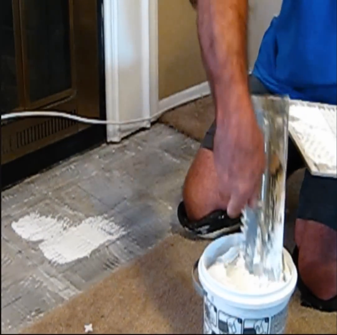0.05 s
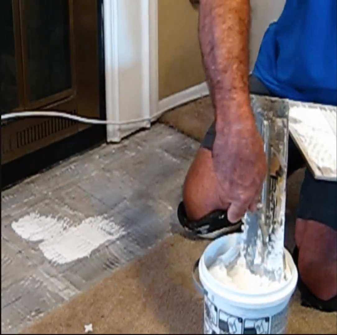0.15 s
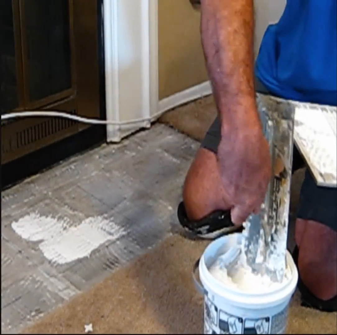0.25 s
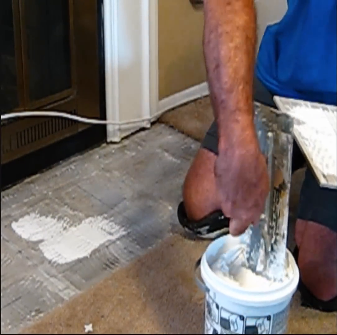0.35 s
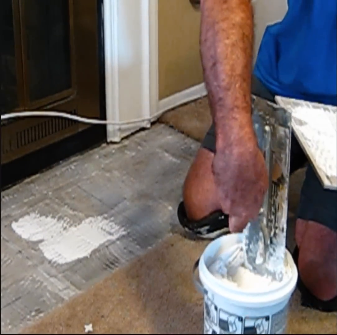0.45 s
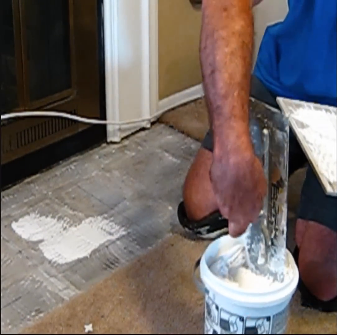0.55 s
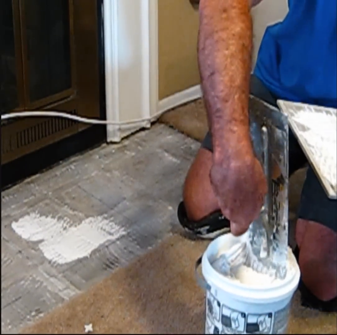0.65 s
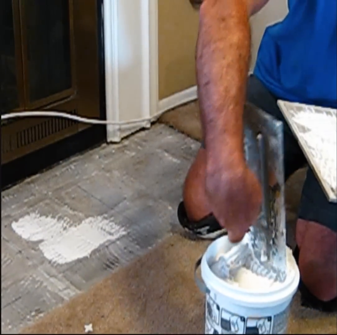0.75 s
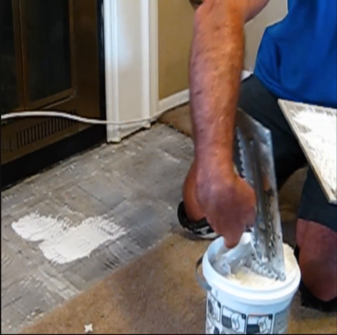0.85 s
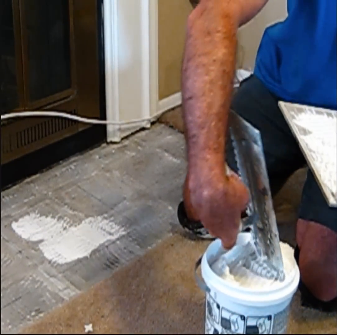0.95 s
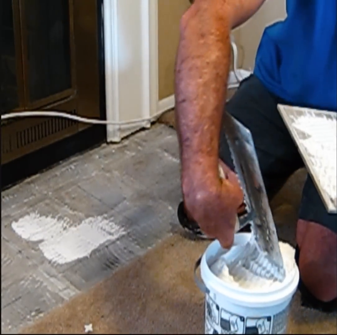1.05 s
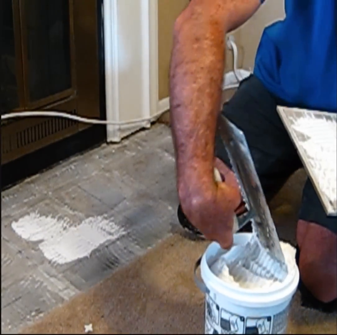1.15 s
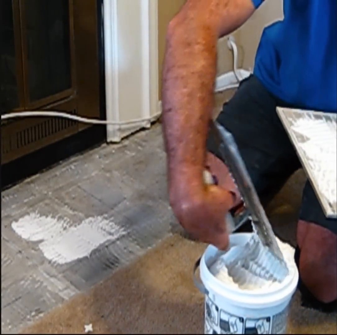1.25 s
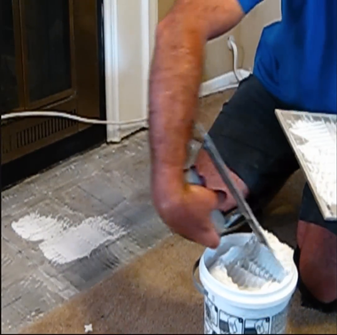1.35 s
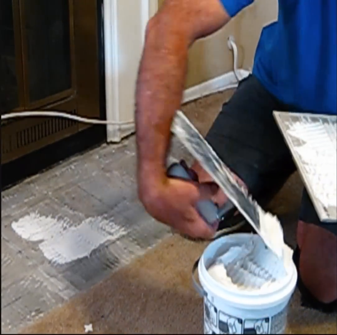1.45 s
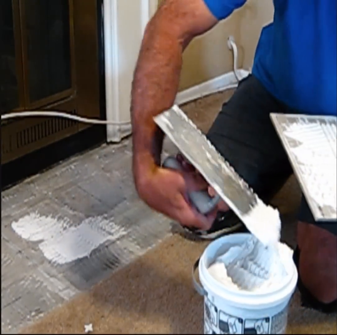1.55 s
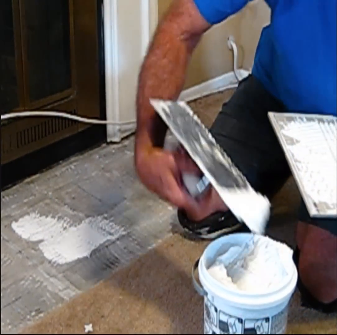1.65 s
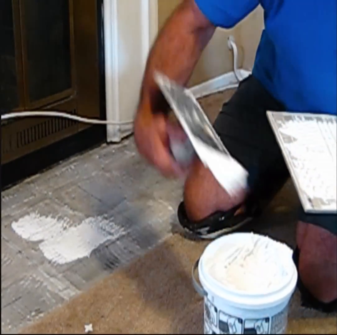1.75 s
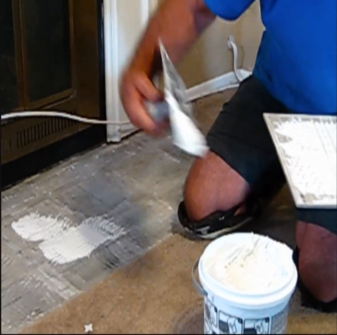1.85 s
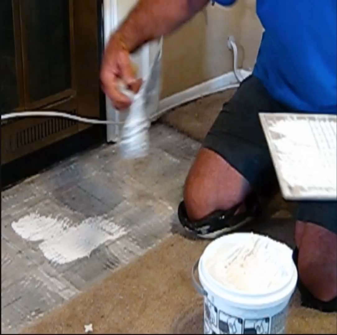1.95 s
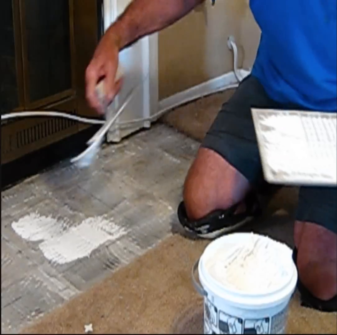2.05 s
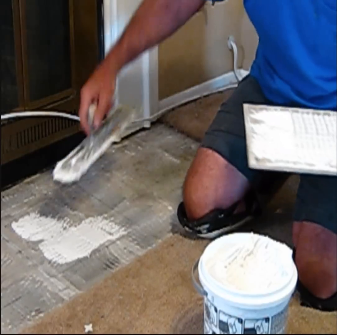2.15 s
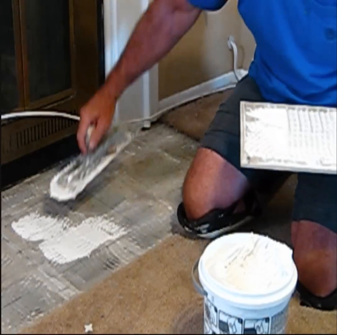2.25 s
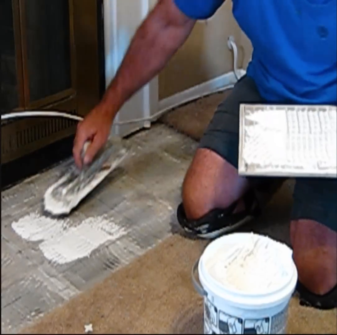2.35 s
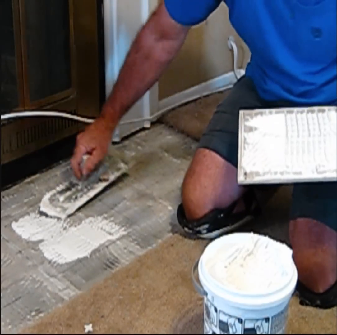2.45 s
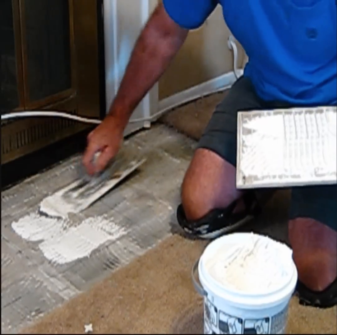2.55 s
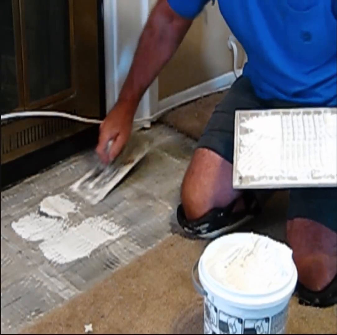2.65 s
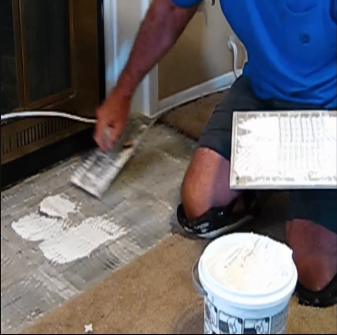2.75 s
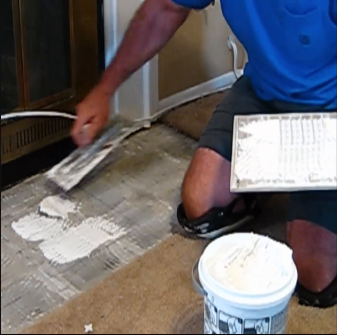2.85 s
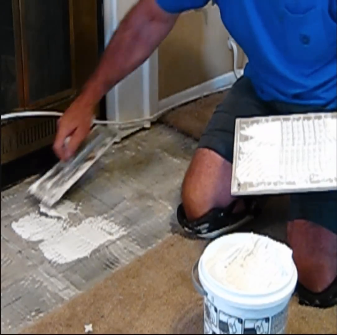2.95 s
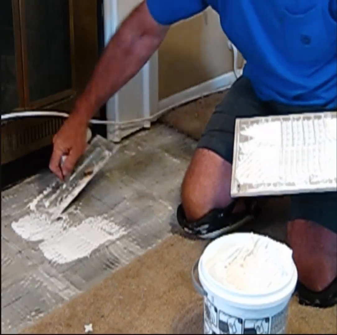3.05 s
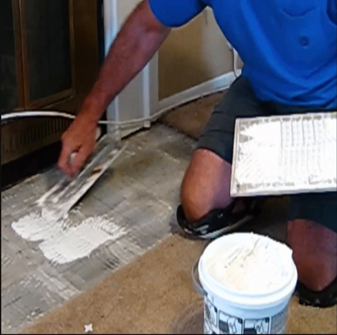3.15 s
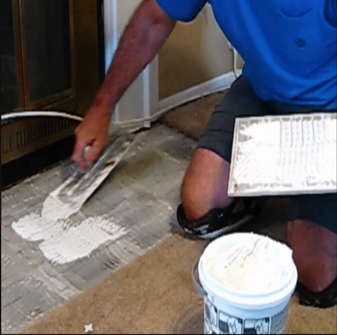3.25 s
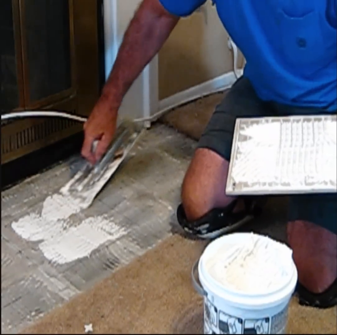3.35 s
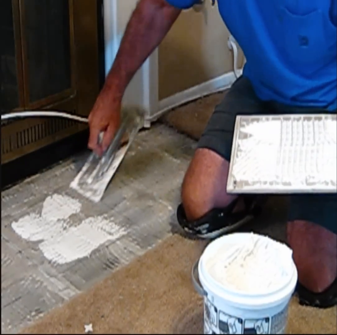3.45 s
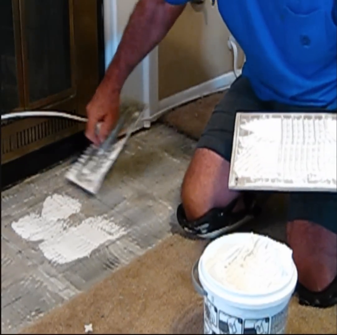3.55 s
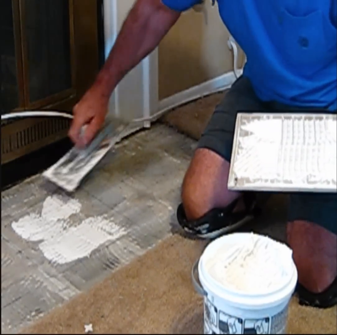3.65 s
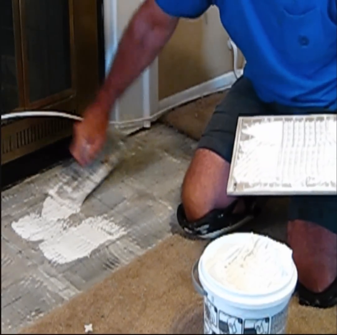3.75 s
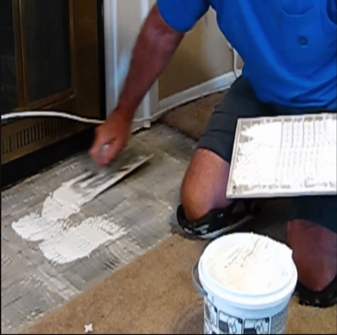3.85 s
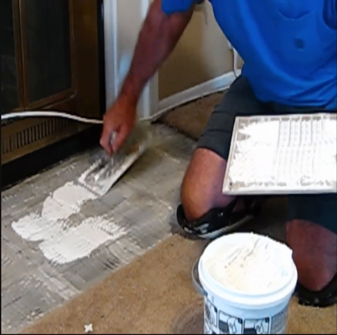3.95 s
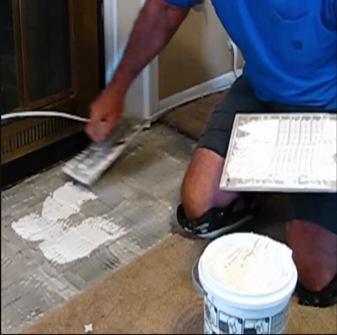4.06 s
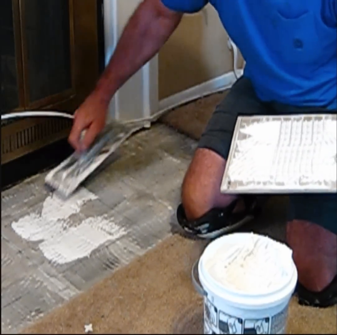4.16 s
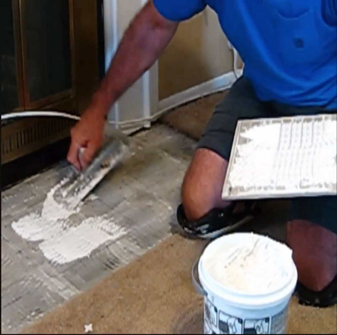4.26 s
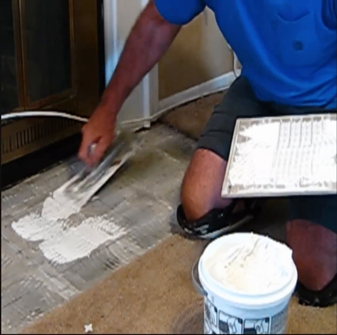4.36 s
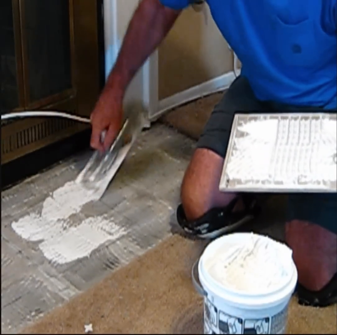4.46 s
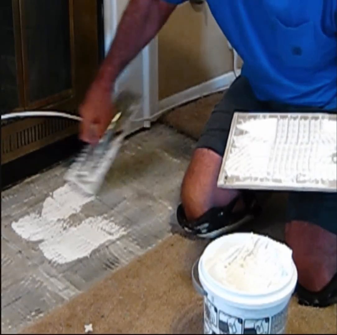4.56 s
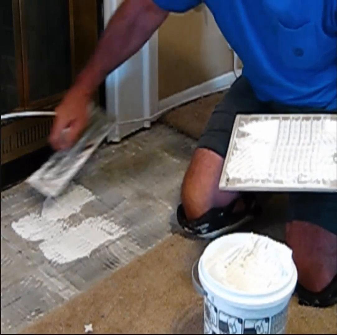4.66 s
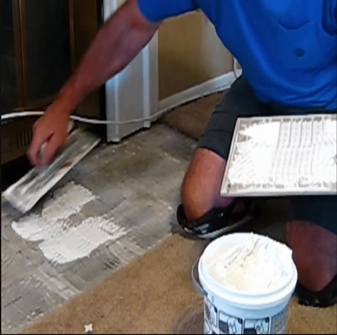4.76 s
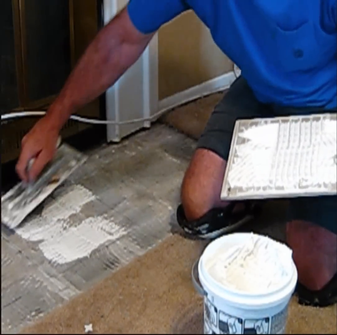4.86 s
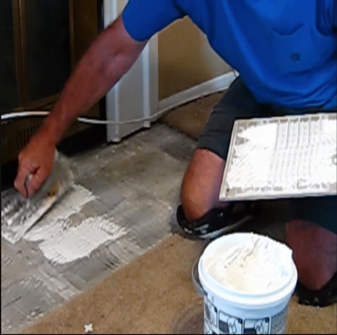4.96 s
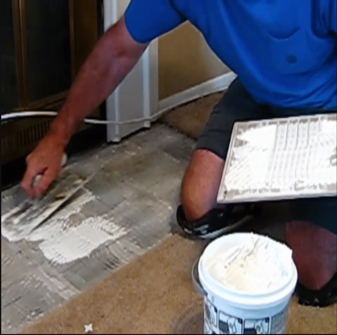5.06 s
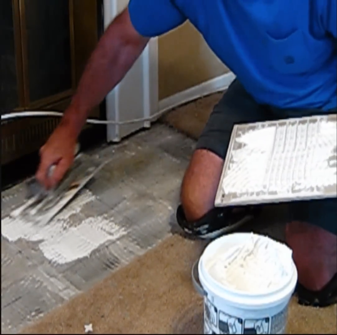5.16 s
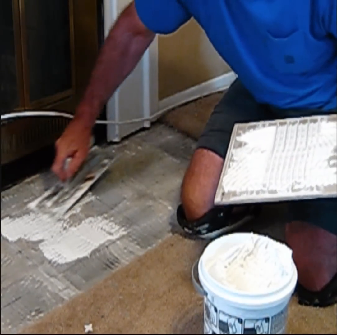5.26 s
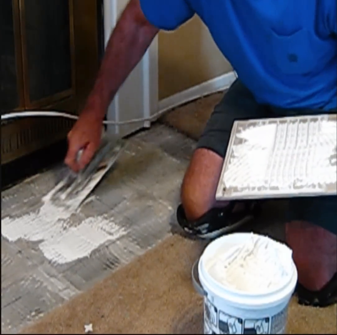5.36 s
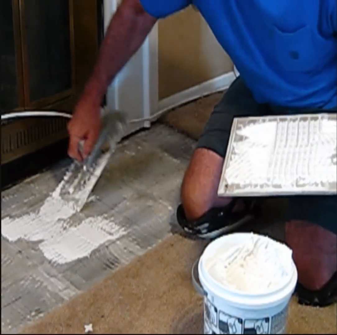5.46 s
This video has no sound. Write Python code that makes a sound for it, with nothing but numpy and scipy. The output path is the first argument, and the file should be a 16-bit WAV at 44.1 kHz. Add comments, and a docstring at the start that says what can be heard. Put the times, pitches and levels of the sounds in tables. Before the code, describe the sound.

In a small, slightly echoing room, soft air noise and a faint hum lie under small wet pops and ticks as paste is lifted from a plastic bucket. Then comes the louder work, heard from nearby: a notched steel trowel clacks down on a cement floor and drags through adhesive and grit. Several short, uneven rasping strokes follow with brief pauses, each with some chatter and a thin metallic ring.

```python
"""A notched steel trowel spreads tile adhesive on a cement floor in a small room.
The blade lands with a clack and drags over grit: its teeth rasp, and under pressure the edge judders
and sets the plate ringing. Before that it scoops the paste from a plastic bucket, with only small
ticks, plops and swishes. Underneath, air moves and an appliance hums faintly."""
import sys
import numpy as np
from scipy import signal
from scipy.fft import rfft, irfft
from scipy.io import wavfile

SR = 44100
rng = np.random.default_rng(int(sys.argv[2]) if len(sys.argv) > 2 else 0)


def wrap_up_sound(samples):
    """Save the sound to the file named by the first command line argument, as 16-bit audio."""
    columns = np.atleast_2d(samples).T
    # keep every value between -1 and 1, then stretch to whole-number steps
    tamed = np.clip(columns, -1, 1)
    steps = np.round(tamed * 32767).astype(np.int16)
    wavfile.write(sys.argv[1], SR, steps)


N = 242991


def from_db(db):
    """Decibels to gain."""
    return 10 ** (np.asarray(db) / 20)


def rms_one(x):
    """Scale to rms 1."""
    return x / np.sqrt(np.mean(x ** 2) + 1e-20)


def seconds():
    """The time of every sample."""
    return np.arange(N) / SR


def add(out, start_s, sound):
    """Mix a short sound in at start_s."""
    part = out[max(round(start_s * SR), 0):][:len(sound)]
    part += sound[:len(part)]


def swell(middle_s, half_s):
    """A bell-shaped fade in and out, height 1."""
    return np.exp(-np.minimum(((seconds() - middle_s) / half_s) ** 2, 50))


def drift(rate_hz):
    """A random wander, rms 1."""
    knots = rng.standard_normal(N // 20)
    return rms_one(np.interp(seconds() * rate_hz, np.arange(len(knots)), knots))


def at_hz(points, hz):
    """Read a curve on a log-frequency axis."""
    known_hz, values = np.transpose(points)
    return np.interp(np.log(np.maximum(hz, 1)), np.log(known_hz), values)


def coloured(x, spectrum):
    """A minimum-phase EQ, scaled to keep the power of white noise."""
    size = 8192
    gains = rms_one(from_db(at_hz(spectrum, np.linspace(0, SR / 2, size // 2 + 1))))
    cepstrum = irfft(np.log(gains))
    cepstrum[1:size // 2] *= 2
    cepstrum[size // 2 + 1:] = 0
    impulse = irfft(np.exp(rfft(cepstrum)))
    return signal.fftconvolve(x, impulse)[:N]


def softened(x, cutoff_hz):
    """A one-pole low-pass: a padded contact."""
    pole = np.exp(-2 * np.pi * cutoff_hz / SR)
    return signal.lfilter([1 - pole], [1, -pole], x)


def pole_pair(hz, width_hz):
    """The polynomial of one resonance."""
    radius = np.exp(-np.pi * width_hz / SR)
    return np.array([1, -2 * radius * np.cos(2 * np.pi * hz / SR), radius * radius])


def resonate(x, hz, width_hz):
    """Ring one resonance, with the treble above it softened; energy 1."""
    rung = softened(signal.lfilter([1, 0, -1], pole_pair(hz, width_hz), x), hz)
    return rung / np.linalg.norm(rung)


def grains(per_s, spread_db, size=N):
    """Clicks at random moments with uneven sizes and signs; rms 1."""
    sizes = from_db(spread_db * np.minimum(rng.exponential(1, size), 4))
    signs = rng.choice([-1, 1], size)
    return rms_one(sizes * signs * (rng.random(size) < per_s / SR))


def burst(decay_s):
    """One click and a dying spray of smaller ones; energy 1."""
    age = np.arange(SR // 2) / SR
    spray = grains(per_s=9000, spread_db=0.5, size=len(age)) * np.exp(-np.minimum(age / decay_s, 50))
    return rms_one(spray + 4 * (age == 0)) / np.sqrt(len(age))


# Tone of the air bed: freq_hz, gain_db
AIR_EQ = [(15, -29), (25, -10), (274, -9.5), (378, -10.5), (552, -11), (631, -6), (684, -9), (945, -10.5),
          (1850, -13.5), (2120, -15.5), (2560, -17.5), (6730, -22), (7910, -30), (9050, -25.5),
          (15500, -30.5)]


def room_air(level_db=-54):
    """Moving air lays a soft, steady bed of noise."""
    return from_db(level_db) * coloured(rng.standard_normal(N), AIR_EQ)


# Swish cues: middle_s, half_length_s, level_db
SWISH_CUES = [(0.034, 0.12, -61), (0.987, 0.11, -63), (2.155, 0.12, -61.5), (2.526, 0.22, -59.5)]
# Bright tone of the swishes: freq_hz, gain_db
SWISH_EQ = [(500, -13), (2500, -10), (5000, -3), (7000, -6), (12000, -11.5), (16000, -36)]


def swishes():
    """Clothing and paste on steel rustle faintly as the trowel is loaded and carried over."""
    envelope = sum(from_db(db) * swell(middle_s, half_s) for middle_s, half_s, db in SWISH_CUES)
    flutter = from_db(0.44 * drift(rate_hz=10))
    return envelope * flutter * coloured(grains(per_s=2200, spread_db=4.5), SWISH_EQ)


def appliance_hum(pitch_hz=622, level_db=-58, start_s=0.22, fade_in_s=1.56):
    """A motor's tone fades in and holds, wavering slightly in pitch and level."""
    cycles = np.cumsum(pitch_hz + 2.92 * drift(rate_hz=13)) / SR
    fade_in = np.clip((seconds() - start_s) / fade_in_s, 0, 1)
    level = from_db(level_db + drift(rate_hz=17))
    return fade_in * level * np.sqrt(2) * np.sin(2 * np.pi * cycles)


# Sticky ticks and plops: start_s, level_db, pitch_hz, width_hz, crackle_s
POP_CUES = [(0.321, -21, 10600, 6000, 0.021), (.534, -24.5, 4500, 1980, 0.0082),
            (.595, -19.5, 965, 80, 0.00045), (1.217, -26.5, 5470, 3000, .008),
            (1.28, -33, 11500, 3000, .002), (1.486, -19, 610, 680, 0.012), (1.492, -19, 1770, 800, 0.013),
            (2.353, -33, 12000, 4000, 0.0044), (2.518, -27.5, 9800, 8000, 0.0087)]


def paste():
    """Paste tears with small pitched pops; the load slides on the raised blade with a thin hiss."""
    hiss = rms_one(resonate(grains(per_s=9000, spread_db=0), hz=4950, width_hz=820))
    out = from_db(-64.5) * swell(middle_s=1.83, half_s=0.15) * hiss
    for start_s, level_db, pitch_hz, width_hz, crackle_s in POP_CUES:
        add(out, start_s, from_db(level_db) * resonate(burst(crackle_s), pitch_hz, width_hz))
    return out


# Short ring of the plastic bucket: pitch_hz, width_hz, level_db
BUCKET_MODES = [(1820, 160, -20), (2510, 400, -16), (4430, 420, -14.5), (6400, 1400, -16)]


def bucket_tick(start_s=1.0252):
    """One sharp touch of steel sets the plastic ringing briefly."""
    out, touch = np.zeros(N), burst(decay_s=0.00075)
    for k, (pitch_hz, width_hz, level_db) in enumerate(BUCKET_MODES):
        add(out, start_s, (-1) ** k * from_db(level_db) * resonate(touch, pitch_hz, width_hz))
    return out


# Blade hits on the floor, with the slap relative to the edge's hit:
# start_s, clack_db, brightness_hz, skid_s, thud_db, thud_cutoff_hz, slap_db
LANDING_CUES = [(2.587, -22, 14000, 0.016, -50, 200, -20), (2.637, -19, 9000, 0.016, -39, 200, -18),
                (3.1288, 0, 6800, 0.013, -18.5, 200, 4.5), (3.353, -13, 1490, 0.017, -14, 600, -16),
                (3.8516, 4, 4450, 0.0064, 3, 1100, -4.5), (3.92, -23, 1000, 0.022, -15, 500, -8),
                (4.331, -2, 5000, 0.025, -1.5, 60, -1), (5.032, -20, 1000, 0.0044, -6, 55, -14),
                (5.189, -25.5, 6000, 0.0018, -27, 201, -18)]
# Hard tone of the clack: freq_hz, gain_db
CLACK_EQ = [(30, -66), (300, -7), (700, -4), (1000, 9), (1230, 9.5), (1450, 4.5), (1900, 4), (3500, 1),
            (7000, 1.5), (12000, -0.5), (16000, -16)]
# Low body of the floor's thud: freq_hz, gain_db
THUD_EQ = [(20, -42), (55, -29), (86, -3), (112, -10.5), (165, 1.5), (240, 2.5), (310, -2), (450, 6),
           (700, -2.5), (1200, -18), (4000, -39)]


def landings(bounces=3, bounce_s=0.011, bounce_loss_db=13, slap_hz=1610, slap_skid_s=0.009):
    """The edge clacks and skids, duller when padded by paste; the hand's weight thuds into the floor."""
    edge, weight = np.zeros(N), np.zeros(N)
    for start_s, clack_db, brightness_hz, skid_s, thud_db, thud_hz, slap_db in LANDING_CUES:
        contacts = [(start_s, 0, brightness_hz, skid_s)]
        # After the edge, the plate slaps down and bounces, ever weaker.
        contacts += [(start_s + (k + 1) * bounce_s, slap_db - k * bounce_loss_db, slap_hz, slap_skid_s)
                     for k in range(bounces)]
        for at_s, touch_db, cutoff_hz, decay_s in contacts:
            push = from_db(touch_db) * burst(decay_s)
            add(edge, at_s, from_db(clack_db) * softened(push, cutoff_hz))
            add(weight, at_s, from_db(thud_db) * softened(softened(push, thud_hz), 2 * thud_hz))
    return from_db(5.5) * coloured(edge, CLACK_EQ), from_db(2) * coloured(weight, THUD_EQ)


# Metallic ring of the blade: pitch_hz, width_hz, boost_db
BLADE_MODES = [(376, 30, 5), (918, 20, 7.5), (1003, 22, 6.5), (1168, 28, 5), (1212, 18, 4), (1308, 38, 9.5),
               (1457, 18, 7), (1535, 25, 3), (1722, 22, 4), (2207, 24, 4), (2368, 70, 4), (2939, 28, 4),
               (3123, 26, 5), (3236, 26, 3), (3308, 30, 5.5), (3557, 60, 4), (3800, 28, 3.5)]


def blade_ring(x):
    """Every mode of the steel plate boosts its own frequency and rings on."""
    for pitch_hz, width_hz, boost_db in BLADE_MODES:
        zeros = pole_pair(pitch_hz, width_hz * from_db(boost_db))
        x = signal.lfilter(zeros, pole_pair(pitch_hz, width_hz), x)
    return x


# Pushes of the blade, with judder and singing relative to the rasp at mid drag:
# start_s, bite_s, drag_s, rasp_db, swell_db, judder_db, singing_db
STROKE_CUES = [(2.63, .058, .10, -20.5, -3, -5.5, -0.5), (3.184, 0.015, 0.046, -24.5, -1.5, -10.5, -3.5),
               (3.24, 0.026, 0.11, -30, -6, -3, -10), (3.325, 0.025, 0.23, -30, 4, -5.5, -24),
               (3.425, 0.025, 0.063, -22, -1, -6.5, -6.5), (3.489, 0.032, .05, -20.5, -4, -1.5, 0),
               (3.963, 0.014, 0.023, -32.5, 2.5, -11, -3.5), (3.999, 0.026, 0.012, -26.5, -1, -11, -4.5),
               (4.36, 0.049, 0.14, -28.5, 1.5, -4.5, -7.5), (4.478, 0.044, 0.063, -19.5, -7, -3, -5),
               (5.034, 0.014, 0.011, -42.5, -2.5, -11, -1), (5.189, 0.12, 0.04, -22, -1.5, -20, -1.5),
               (5.34, 0.026, 0.12, -26, -0.5, -9.5, -17)]


def strokes(bite_curve=1.3, lift_s=0.044):
    """Envelopes of rasp, judder, singing and fine grit: each push bites, drags and lifts off."""
    envelopes = np.zeros((4, N))
    for start_s, bite_s, drag_s, rasp_db, swell_db, judder_db, singing_db in STROKE_CUES:
        age = seconds() - start_s
        bite = np.clip(age / bite_s, 0, 1) ** bite_curve
        lift = np.clip(1 - (age - bite_s - drag_s) / lift_s, 0, 1)
        contact = bite * lift
        touching = contact > 0
        travel = np.clip((age[touching] - bite_s) / drag_s, 0, 1)
        rasp = contact[touching] * from_db(rasp_db + swell_db * travel)
        # As the paste runs out, the blade judders and sings more and the fine grit recedes.
        past_middle = travel - 0.5
        over_rasp_db = [np.zeros_like(rasp),
                        judder_db + 10.5 * past_middle,
                        singing_db + 5.5 * past_middle,
                        -4.5 - 2 * past_middle]
        envelopes[:, touching] = np.maximum(envelopes[:, touching], rasp * from_db(over_rasp_db))
    return envelopes


# Broad rasp of the teeth: freq_hz, gain_db
RASP_EQ = [(60, -30.5), (250, -20), (700, -9.5), (1100, -2), (1700, -2), (2600, 2.5), (4000, 1.5),
           (6500, 1), (9000, -7), (16000, -33)]
# Midrange chatter of the edge: freq_hz, gain_db
JUDDER_EQ = [(60, -34), (160, -21), (320, -23), (480, -11.5), (560, -4.5), (770, -4), (870, -3), (1060, 6),
             (1300, -5), (1700, -2), (3000, -6.5), (8000, -41.5)]
# Narrow peaks of the singing plate: freq_hz, gain_db
SINGING_EQ = [(600, -47.5), (1000, -16), (1180, -2), (1290, 0), (1420, -8), (1600, -11), (2200, -22),
              (3000, -35), (3550, -10.5), (4200, -35), (5000, -57)]
# Top-end sizzle of fine grit: freq_hz, gain_db
GRIT_EQ = [(3000, -63), (6000, -1), (8500, 7), (12000, 7), (14000, -1), (16000, -4.5)]


def scraping():
    """Teeth crush sand in uneven clumps; the edge sticks and slips more coarsely and bends the plate."""
    rasp, judder, singing, grit = strokes()
    clumps = rms_one(from_db(1.63 * drift(rate_hz=200) + 0.75 * drift(rate_hz=23)))
    teeth = from_db(-1) * coloured(rasp * clumps * grains(per_s=12000, spread_db=2.5), RASP_EQ)
    slips = from_db(-2) * coloured(judder * clumps * grains(per_s=1500, spread_db=0), JUDDER_EQ)
    plate = from_db(-7) * coloured(singing * grains(per_s=4200, spread_db=3), SINGING_EQ)
    dust = from_db(-2.5) * coloured(grit * clumps * grains(per_s=19000, spread_db=1), GRIT_EQ)
    return teeth + slips + plate + dust


# Reverb time of the small room: freq_hz, t60_s
ROOM_DECAY = [(100, 0.28), (500, 0.43), (1200, 0.41), (3500, 0.36), (7000, 0.34), (14000, 0.24)]


def echoes(early_db=-7.5, tail_db=-8, early_decay_s=0.032):
    """Near walls and floor answer at once; a diffuse tail dies band by band."""
    age = np.arange(SR * 2 // 3) / SR
    hz = np.linspace(0, SR / 2, len(age) // 2 + 1)
    white = rfft(rng.standard_normal(len(age)))
    centres_hz = np.geomspace(100, 14000, num=8)
    tail = 0
    for centre_hz, share in zip(centres_hz, np.eye(len(centres_hz))):
        band = irfft(white * at_hz(np.c_[centres_hz, share], hz), len(age))
        tail = tail + band * from_db(-60 * age / at_hz(ROOM_DECAY, centre_hz))
    taps = rng.standard_normal(len(age)) * (rng.random(len(age)) < 0.02)
    early = from_db(early_db) * rms_one(taps * np.exp(-age / early_decay_s) * (age > 0.002))
    late = from_db(tail_db) * rms_one(tail * (age > 0.008))
    return (early + late) / np.sqrt(len(age))


def room(direct, places_per_s=30, places=12):
    """Add reverb: as the trowel moves, one pattern of echoes crossfades into the next."""
    out = direct
    for place in range(places):
        distance = np.abs((seconds() * places_per_s + place) % places - places / 2)
        share = np.sqrt(np.clip(1 - distance, 0, 1))
        out = out + signal.oaconvolve(direct * share, echoes())[:N]
    return out


def scene():
    """Trowel, paste and bucket in the room, over air and hum; the same in both channels."""
    clacks, thuds = landings()
    ring_share = 0.5  # landing flat on the paste damps the plate
    steel = blade_ring(scraping() + ring_share * clacks) + (1 - ring_share) * clacks
    work = steel + thuds + paste() + bucket_tick() + swishes()
    mix = room(work) + room_air() + appliance_hum()
    return np.array([mix, mix])


def record(dry, notch_hz=7875, cutoff_hz=15750):
    """Master EQ: a narrow notch in the treble and a steep top cut."""
    notched = signal.lfilter(*signal.iirnotch(notch_hz, Q=8, fs=SR), dry)
    return signal.sosfilt(signal.ellip(12, 0.2, 70, cutoff_hz, fs=SR, output="sos"), notched)


dry = scene()
out = record(dry)
wrap_up_sound(out)
```